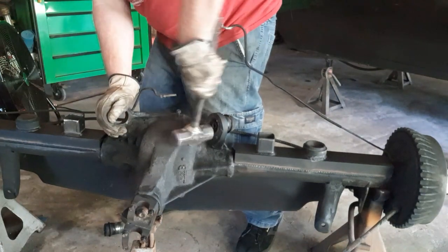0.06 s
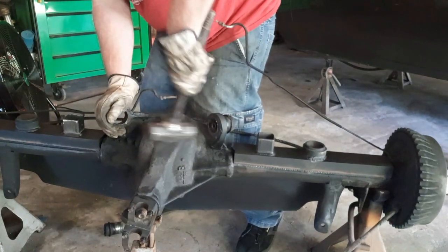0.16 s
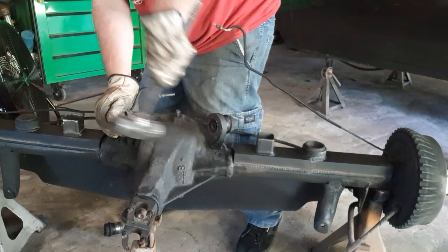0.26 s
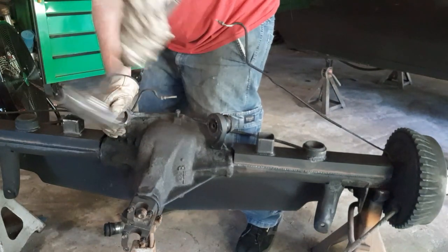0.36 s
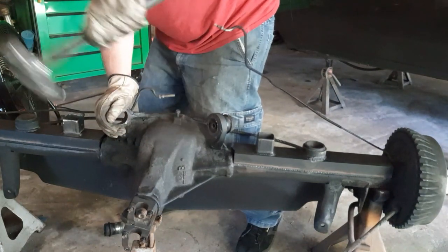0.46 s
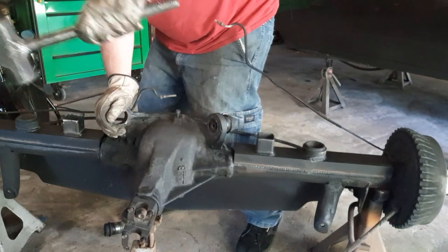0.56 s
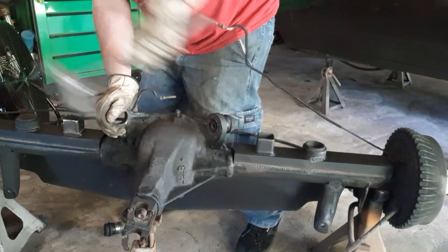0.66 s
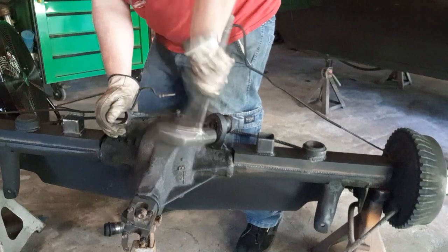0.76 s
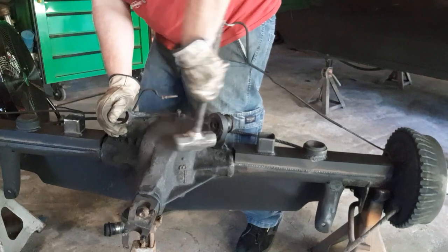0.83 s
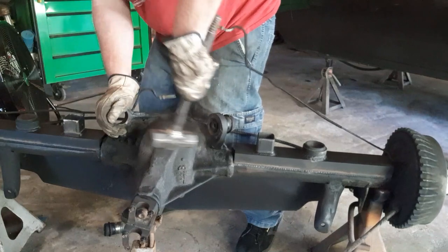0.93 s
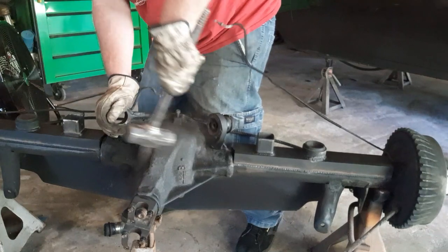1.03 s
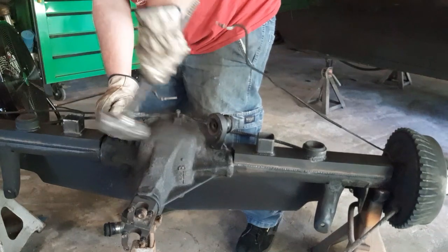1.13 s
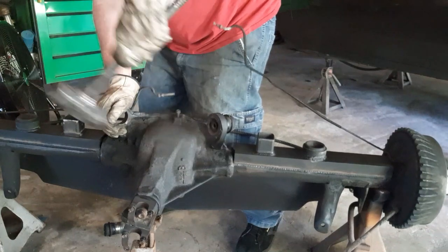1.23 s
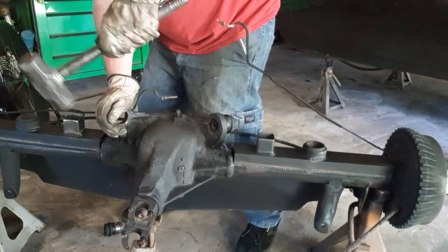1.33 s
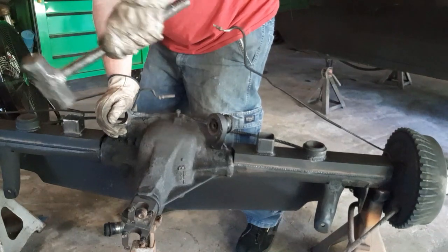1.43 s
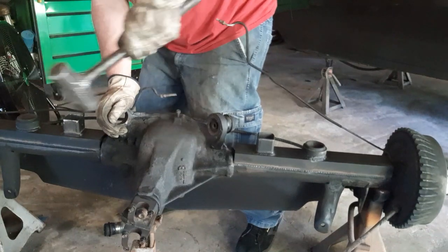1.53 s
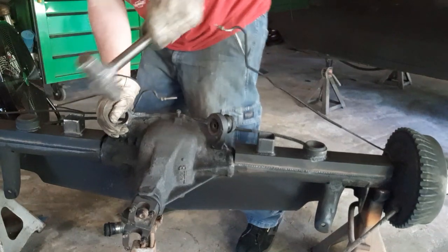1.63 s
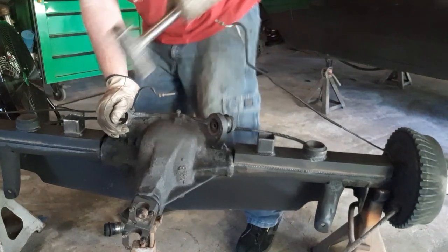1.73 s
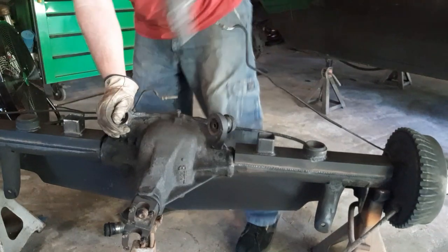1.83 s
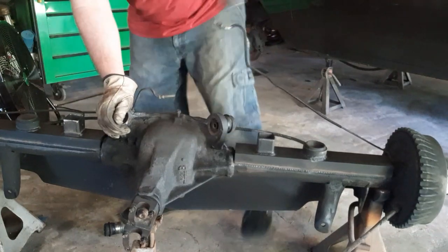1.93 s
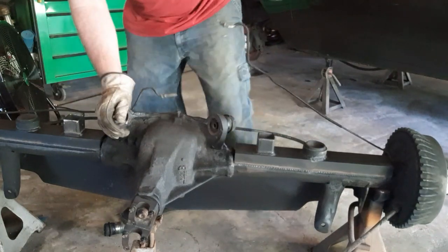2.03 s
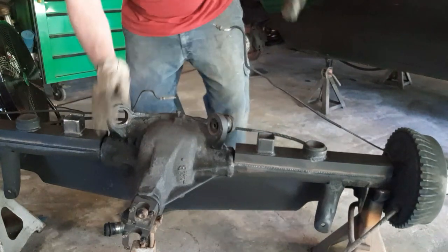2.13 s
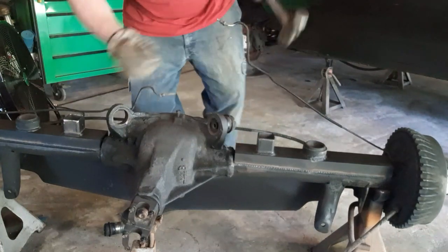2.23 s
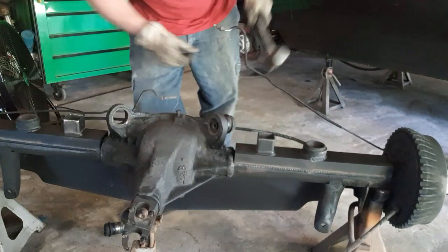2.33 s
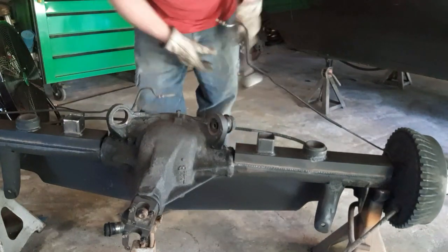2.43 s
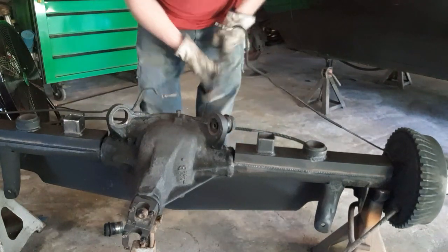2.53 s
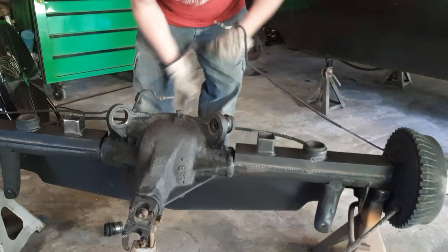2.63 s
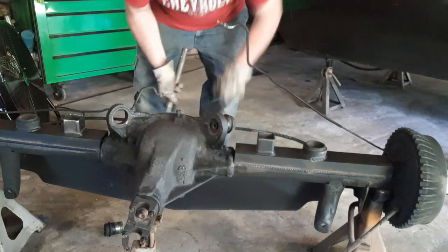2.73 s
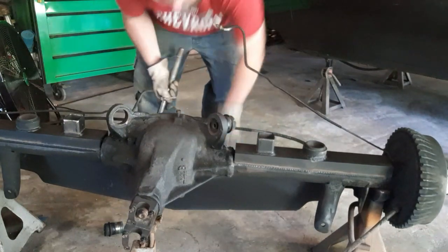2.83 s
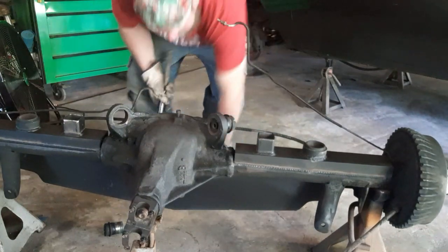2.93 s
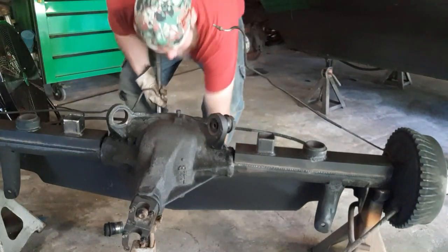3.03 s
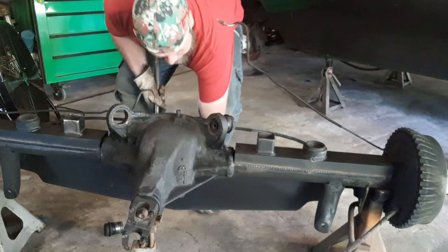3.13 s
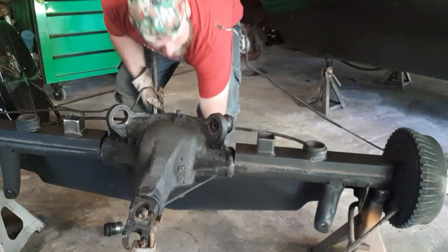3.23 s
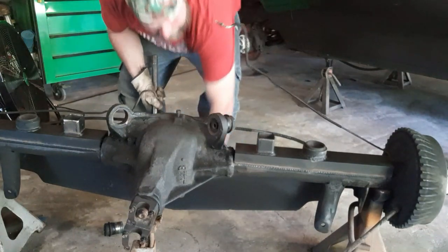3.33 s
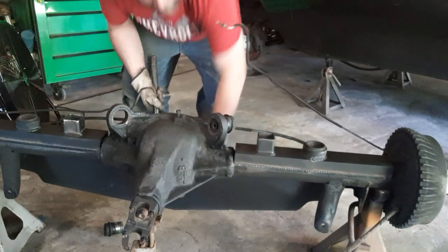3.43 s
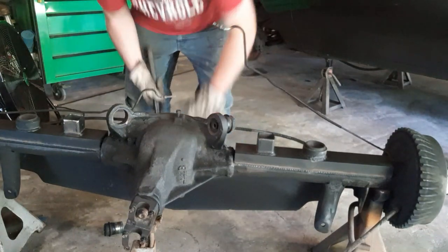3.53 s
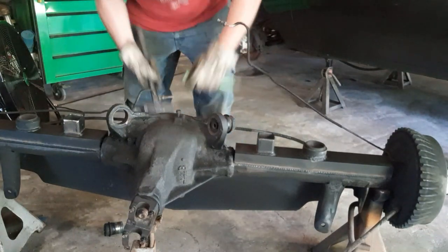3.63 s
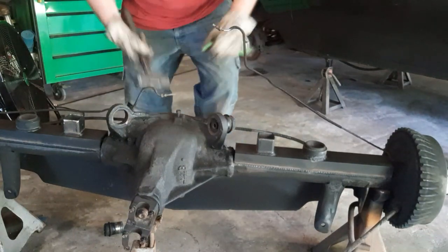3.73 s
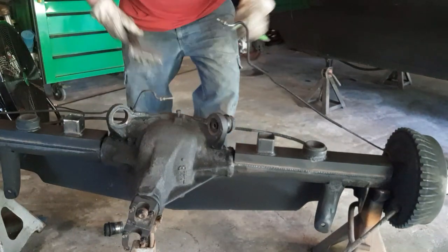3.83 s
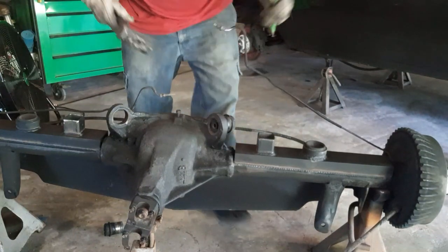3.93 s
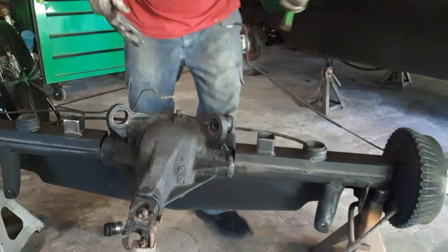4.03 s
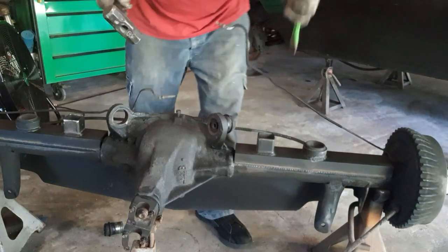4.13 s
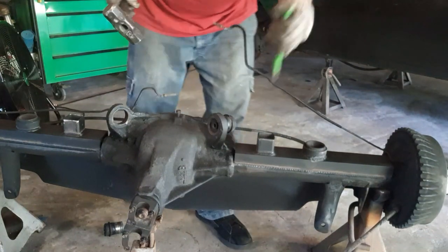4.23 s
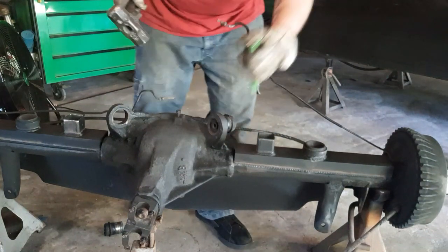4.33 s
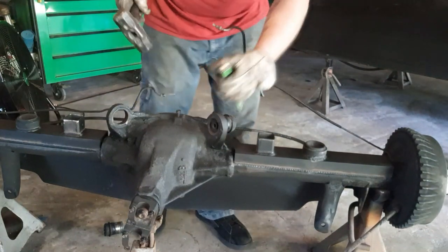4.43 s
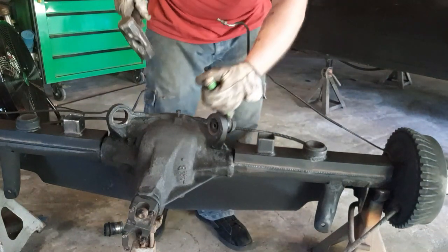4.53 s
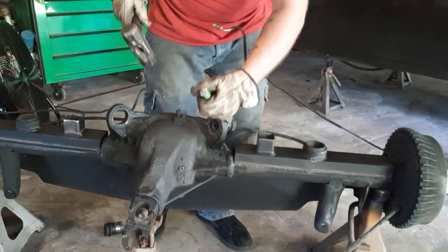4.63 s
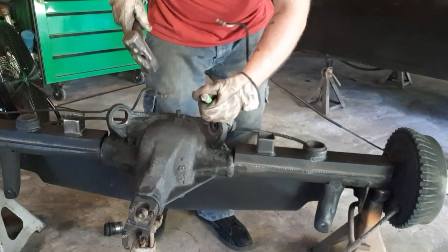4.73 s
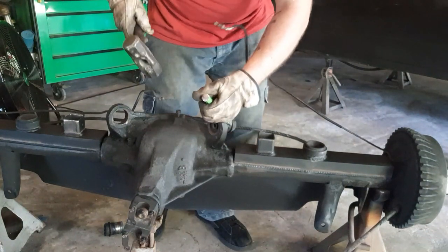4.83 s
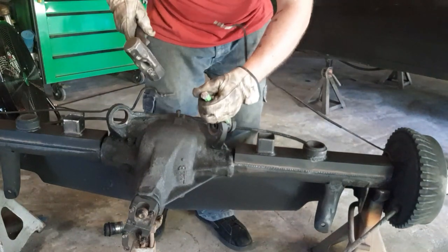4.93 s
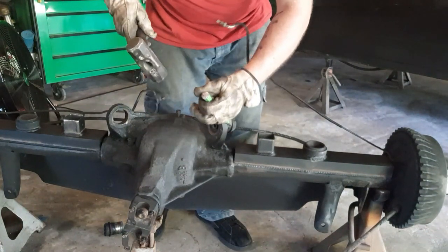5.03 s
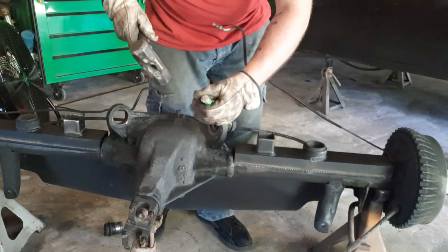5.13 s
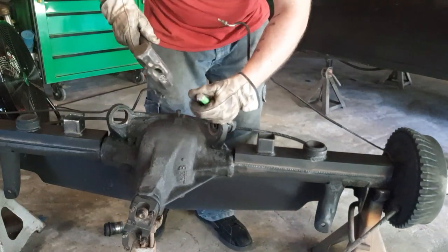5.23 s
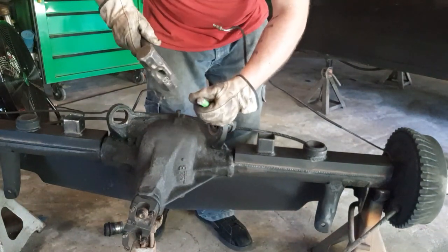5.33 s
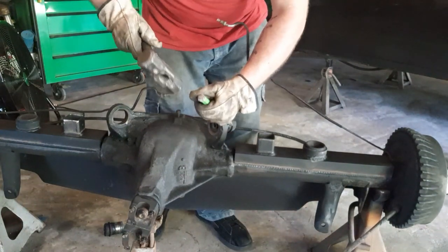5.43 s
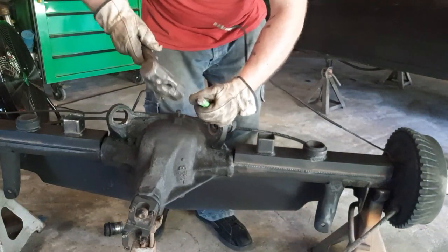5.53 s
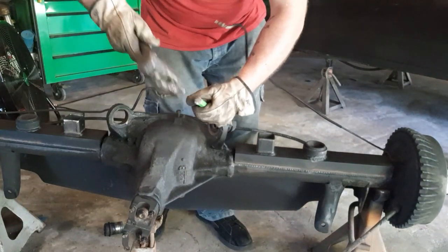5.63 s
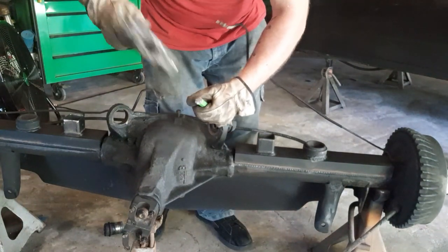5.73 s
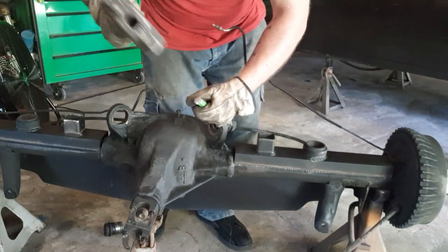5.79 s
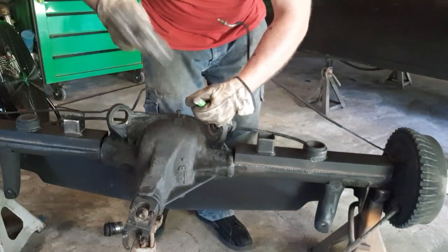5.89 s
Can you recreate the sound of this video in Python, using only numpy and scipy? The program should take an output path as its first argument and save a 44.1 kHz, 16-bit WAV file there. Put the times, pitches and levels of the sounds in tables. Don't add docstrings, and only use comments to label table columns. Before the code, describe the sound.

Two sharp steel-on-steel blows, about three quarters of a second apart, with short garage echoes and a long metallic ring. A quieter stretch follows: faint scuffs, a sudden tool clatter, a brief scraping rattle, a dull footstep, then scattered clinks and light taps. Stereo camera microphone nearby; its gain drops for the blows and rises in steps, uncovering hiss, low rumble and motor hum.

```python
import sys
import numpy as np
from scipy import signal
from scipy.fft import rfft, irfft
from scipy.io import wavfile
from scipy.ndimage import uniform_filter1d

SR = 44100
rng = np.random.default_rng(int(sys.argv[2]) if len(sys.argv) > 2 else 0)


def dump_mix(stems):
    frames = np.atleast_2d(stems).T
    limited = np.clip(frames, -1, 1)
    pcm = np.round(limited * 32767).astype(np.int16)
    wavfile.write(sys.argv[1], SR, pcm)


def undo_db(level):
    steps = np.asarray(level, float) / 20
    return 10 ** steps


N = 262836

# start in seconds, peak in dB, share of tool clank in dB, thud in dB,
# time the limiter holds the level in seconds.
BLOWS = [
    (0.057, -4.5, 1, 3, 0.034),
    (0.809, -5.5, 2, -8, 0.012),
]


def at(table, hz):
    f, v = np.transpose(table)
    return np.interp(np.log(hz + 1), np.log(f), v)


def curves(table):
    s, *columns = np.transpose(table)
    return [np.interp(np.arange(N) / SR, s, c) for c in columns]


def unit(x):
    return x / np.sqrt(np.mean(x ** 2))


def colour(x, table):
    n = x.shape[-1]
    return irfft(rfft(x) * undo_db(at(table, np.arange(n // 2 + 1) * SR / n)), n)


def band(x, lo_hz, hi_hz):
    edges = [lo_hz, min(hi_hz, .45 * SR)]
    return signal.sosfilt(signal.butter(3, edges, "bandpass", fs=SR, output="sos"), x)


def wander(rate):
    k = int(SR / rate)
    steps = np.repeat(rng.standard_normal(N // k + 1), k)[:N]
    return 1.2 * uniform_filter1d(steps, k)


def stroke(peak_s, rise_s, t60, hold_s):
    age = np.arange(0, N, 16) / SR - peak_s
    climb_db = 25 * age / max(rise_s, .001)
    fade_db = -60 * np.maximum(age - hold_s, 0) / max(t60, .02)
    return undo_db(np.where(age < 0, climb_db, fade_db))


def gestures(rows):
    power = sum(undo_db(2 * db) * stroke(s, rise_s, t60, hold_s) ** 2 for s, rise_s, db, t60, hold_s in rows)
    return np.interp(np.arange(N), np.arange(0, N, 16), np.sqrt(power))


def ring(modes, start_s, spread_db, beat_db, apart=1):
    out = np.zeros((2, N))
    t = np.arange(max(int(start_s * SR), 0), N) / SR - start_s
    first = N - len(t)
    for (hz, db, t60), c in zip(modes, rng.standard_normal((len(modes), 24))):
        u = t[:int(1.1 * t60 * SR)]
        beats = c[4:] * np.minimum(np.arange(20) / 4, 1)
        waver = np.interp(u, np.linspace(0, 1.1 * t60, 20), beats)
        place_gain = undo_db(spread_db * c[:2, None])
        fade = undo_db(db - 60 * u / t60 + beat_db * waver) * place_gain
        phase = 2 * c[2] + 2 * apart * (c[2:4, None] - c[2])
        out[:, first:first + len(u)] += fade * np.sin(2 * np.pi * hz * u + phase)
    return out


def garage(spectrum, hold_s):
    # frequency in Hz, time to fall 60 dB in seconds.
    echo_t60 = [(60, 0.11), (160, 0.36), (420, 0.42), (1100, 0.34), (2900, .35), (6500, .28), (9000, 0.18),
                (11000, 0.29), (14000, 0.082)]
    patchy_db = 2.5, 5
    t = np.arange(SR) / SR
    crack = unit(colour(rng.standard_normal((2, SR)), spectrum))
    bins = SR // 2 + 1
    below, above = patchy_db[0] * wander(500)[:bins], patchy_db[1] * wander(150)[:bins]
    patches = np.where(np.arange(bins) < 7500, below, above)
    crack = unit(irfft(rfft(crack) * undo_db(patches), SR))
    out = 0
    for hz in 45 * 2 ** np.arange(0, 8.6, .5):
        fade_db = -60 * np.maximum(t - hold_s, 0) / at(echo_t60, hz)
        out = out + band(crack, hz / 2 ** 0.14, hz * 2 ** .25) * undo_db(fade_db)
    lumps = undo_db(1.2 * wander(300)[:SR])
    return out * (1 + 0.52 * np.exp(-t / 0.0022)) * lumps


def blows():
    # frequency in Hz, level in dB per Hz.
    crack = [
        [(35, -54), (60, -29), (150, -12), (268, -10), (417, -9.5), (527, -9.5), (1040, -14.5), (1280, -8), (2470, -11), (5720, -11), (7060, -10.5), (7350, -23), (7650, -48.5), (7950, -29), (11200, -29), (13600, -33), (14900, -38.5), (16000, -91)],
        [(35, -70), (60, -43), (227, -19.5), (287, -8.5), (540, -13.5), (593, -12.5), (822, -10), (1040, -4.5), (1820, -7.5), (2090, -10), (6580, -10.5), (7570, -23.5), (11200, -31), (12100, -35), (16000, -54.5)],
    ]
    # frequency in Hz, level in dB, t60 in seconds.
    clank = [
        [(528, -6, 0.36), (829, 1, 0.23), (1324, -7, 0.3), (1457, -5, .3), (1631, -8, 0.37), (1859, -4, .3), (2078, 2, 0.28), (2261, -8, 0.37), (2659, 6, 0.24), (2789, 1, 0.26), (3042, -4, 0.24), (3451, -4, 0.27), (3741, -6, 0.28), (3825, -2, .27), (3993, 0, .25), (4253, -9, 0.26), (4980, -4, 0.18), (5620, -2, 0.19), (6632, -6, 0.24), (6870, -5, .2)],
        [(291, -12, .3), (533, -20, 0.4), (680, -12, .3), (827, 4, 0.17), (1561, -12, .3), (1865, -9, 0.33), (2315, -14, 0.3), (3155, -11, 0.3), (3456, -14, 0.3), (3710, -10, 0.27), (3970, -13, .25), (4323, -13, 0.3), (4673, -14, 0.3), (5010, -15, .25), (5230, -14, .25), (5459, -17, 0.3), (6481, -12, 0.22), (6772, -12, 0.22)],
    ]
    # frequency in Hz, level in dB, t60 in seconds.
    head = [(7980, -2, .12), (8550, -8, .2), (8710, -8, .2), (9030, -8, .18), (9680, -8, .15),
            (9808, -9, .17), (10100, -14, .19), (10330, -9, .25), (10820, -6, .17), (11210, -9, .22),
            (11730, -7, .22), (12510, -12, .25), (13150, -4, .14), (13960, -13, .33), (14030, -14, .33)]
    head_levels = -29.5, -32
    # frequency in Hz, level in dB, t60 in seconds.
    face = [
        [(6640, -14, 0.035)],
        [(6560, -11, 0.057)],
    ]
    # frequency in Hz, level in dB per Hz.
    haze = [(60, -20), (170, -8), (250, -2.5), (600, -10), (1200, -12), (2500, -21), (4200, -24),
            (5500, -44.5), (11000, -42), (12500, -79)]
    out = np.zeros((2, N))
    t = np.arange(2 * SR) / SR
    for (s, db, clank_db, _, hold_s), spectrum, tools, head_db, ping in zip(
            BLOWS, crack, clank, head_levels, face):
        i = int(s * SR)
        out[:, i:i + SR] += undo_db(db - 8.0) * garage(spectrum, hold_s)
        far = unit(colour(rng.standard_normal((2, 2 * SR)), haze))
        out[:, i:i + 2 * SR] += far * undo_db(db - 43 - 60 * t / 1.25)
        out += undo_db(db - 15.5 + clank_db) * ring(tools, s, 0.81, 3.2)
        out += undo_db(head_db) * ring(head, s, 1.4, 4.3, apart=0.26)
        out += ring(ping, s, 1.4, 2.2, apart=0.12)
    return out


def thuds():
    floor = [(115, 3.5, 0.044), (75, -8.5, 0.067), (51.4, -23.5, 0.3), (88, -25, 0.35)]  # Hz, dB, t60 s
    out = 0
    for s, db, _, thud_db, _ in BLOWS:
        out = out + undo_db(db - 16.0 + thud_db) * ring(floor, s - .002, 0, 7.3)[0]
    return out * undo_db(np.array([[3.0], [-6.0]]))


def housing():
    # frequency in Hz, level in dB, t60 in seconds.
    casting = [
        [(167, -11, .7), (250, -13, 1.3), (339, -15, .68), (377, -14, .74), (554, -10, 0.8), (684, -13, 0.56), (1109, -6, 0.9), (1217, -22, 0.66), (1324, -10, 0.5), (1534, -16, 0.88), (1707, -21, 1.2), (1787, -25, 2), (2245, -22, 0.91), (2412, -22, 0.66), (2837, -21, 0.47), (3144, -33, 1.5), (3235, -33, 1.3), (3429, -29, 0.83), (3564, -24, 0.83), (3650, -31, 1.5), (4075, -36, 2.2), (4194, -27, 0.28), (4936, -34, 0.25)],
        [(167, -17, 1.1), (215, -24, .4), (264, -15, 1.3), (307, -19, .85), (554, -7, 1.3), (624, -19, 1.5), (689, -26, 1.5), (764, -30, 3.5), (807, -17, 1.1), (1114, -7, 0.78), (1324, -13, 0.6), (1561, -23, 1), (1787, -16, 2.3), (2239, -34, 1.3), (2412, -33, 1.4), (2606, -22, 2.6), (2810, -30, 1.6), (3095, -35, 2.6), (3235, -33, 2.0), (3348, -33, 1.5), (3435, -30, 1.3), (3871, -33, 2.0), (4075, -31, 1.7), (4721, -32, 0.71)],
    ]
    casting_db = -52, -51
    listed_age_s = .24
    out = ring([(1289, -52.5, .45)], -0.059, 1.4, 0.092)
    for (s, *_), modes, db in zip(BLOWS, casting, casting_db):
        fresh = [(hz, d + np.log2(hz / 500) + 60 * listed_age_s / t60, t60) for hz, d, t60 in modes]
        out += undo_db(db) * ring(fresh, s, 1.2, 2.6, apart=.25)
    return out


def tubes(gain_db):
    # frequency in Hz, level at the blow in dB, fade in dB per second, share of camera gain.
    hums = [
        (409, -72, 3, 1.4),
        (475, -54, 20, 1),
    ]
    # start in seconds, damping by the glove on the casting, strength in dB.
    strikes = [
        (-.69, 1.55, 2),
        (.058, 1.55, 4),
        (.809, 1, 0),
        (2.45, 7, 0),
    ]
    out, t = 0, np.arange(N) / SR
    (*struck, touch_s), damping, strength_db = np.transpose(strikes)
    last = np.searchsorted(struck, t) - 1
    age = damping[last] * (t - np.array(struck)[last])
    age = age + damping[-1] * np.maximum(t - touch_s, 0)
    for hz, db, fade_db, share in hums:
        level_db = db - fade_db * age + strength_db[last]
        level_db = level_db + share * np.maximum(gain_db, 0) + 2.2 * wander(9)
        out = out + undo_db(level_db) * np.sin(2 * np.pi * hz * t + np.array([[0], [.6]]))
    return out


def drift():
    # frequency in Hz, width in Hz, level in dB.
    bar = [(1254, 80, -8), (3350, 200, -14), (6250, 570, -9), (3270, 60, -4), (3465, 70, 0), (5893, 105, 4),
           (6650, 29, -1), (8740, 42, -45), (9210, 76, -17), (10595, 120, -16), (12400, 17, -16.5),
           (13400, 34, -15), (15500, 60, -22)]
    # start in seconds, lowest mode in dB, middle modes in dB,
    # top modes in dB, contact length in seconds.
    drags = [(2.764, -68.5, -80, -80, 0.017), (3.228, -51.5, -49.5, -66, 0.015),
             (3.26, -51, -57, -59, 0.0089), (3.309, -55, -46, -49.5, 0.02), (3.335, -58, -42, -62, 0.014),
             (3.345, -58, -48, -46.5, .005), (3.351, -54.5, -43, -43.5, 0.0186),
             (3.377, -46.5, -53, -65.5, 0.015), (3.428, -49.5, -69, -69, 0.016),
             (3.499, -65.5, -84, -82, 0.038), (1.951, -84, -105, -105, 0.18), (4.84, -72, -99, -103, 0.015),
             (4.9, -75.5, -98, -96, .01), (4.948, -71.5, -97.5, -97, .015), (5.273, -77, -94, -100, 0.14)]
    rise_s, t60 = 0.0023, 0.19
    lowest, middle, top = (gestures([(row[0], rise_s, row[k], t60, row[-1]) for row in drags])
                           for k in range(1, 4))
    out = 0
    for hz, width, db in bar:
        phase = 2 * np.pi * np.cumsum(hz + 0.27 * width * wander(1.5 * width + 30)) / SR
        gain = lowest if hz < 2000 else undo_db(db) * (middle if hz < 4000 else top)
        flutter = undo_db(1.6 * wander(110))
        out = out + gain * undo_db(3.5) * flutter * np.array([np.sin(phase), np.cos(phase)])
    return out


def sparks():
    # peak in seconds, rise in seconds, level in dB, t60 in seconds, hold in seconds.
    contacts = [
        (.058, .002, -36, .04, .004),
        (.81, .002, -36, .06, .008),
        (3.355, .1, -60, .3, .03),
        (3.2, .06, -66, .3, .02),
    ]
    # frequency in Hz, level in dB per Hz.
    spectrum = [(2500, -20), (3200, 0), (7000, 0), (8000, -20), (9000, -6), (15500, -4), (16200, -50)]
    return gestures(contacts) * unit(colour(rng.standard_normal((2, N)), spectrum))


def clinks():
    # frequency in Hz, level in dB, t60 in seconds.
    parts = [
        [(517, -4, .4), (1000, -2, .23), (1260, -13, .4), (1569, -7, .3), (1944, -.5, .3), (2105, -3, .3), (2600, -11, .12), (3490, -7, .28), (4200, -10, .2), (6630, 3, .13)],
        [ (513.5, -1, .25), (600, -3, .18), (825, -8, .25), (900, -5, .22), (1320, -16, .2)],
        [(1631, -8, .25), (2659, -1, .24), (2741, -4, .24), (3717, -4, .25), (110, -3, .07)],
        [ (1110, -2.5, .22), (1324, -3, .2), (1457, -3, .2)],
        [(300, 0, .2)],
        [(300, 0, .15)],
        [(325, 0, .2)],
    ]
    # start in seconds, level in dB.
    ring_starts = [(4.649, -49.5), (5.087, -47), (.058, -22), (.81, -28), (3.61, -62), (3.815, -61),
                   (3.86, -62)]
    return sum(undo_db(db) * ring(modes, s, 0.47, 6.0, apart=0.34) for (s, db), modes in zip(ring_starts, parts))


def knocks():
    # start in seconds, peak in dB, ring in Hz, low body in dB, t60 in seconds.
    hits = [(1.615, -59, 1790, 1, 0.17), (1.766, -58.5, 6530, -1, 0.15), (2.048, -36.5, 6580, -33, 0.094),
            (2.313, -42, 3220, -6, 0.46), (2.745, -31.5, 3040, -1.5, 0.091), (2.791, -24, 2050, -26, 0.13),
            (2.917, -50.5, 900, 11.5, 0.049), (2.755, -16.5, 3860, -30, 0.18),
            (3.163, -28.5, 5930, -24, 0.51), (3.225, -34.5, 2860, 1, 0.64),
            (3.308, -26.5, 4527, -25, 0.067), (3.646, -38.5, 4750, -20.5, 0.39),
            (4.021, -32.5, 5530, -8.5, 0.15), (4.076, -46.5, 3680, -23.5, 0.36),
            (4.254, -45, 3740, -18, 0.069), (4.459, -30, 5540, -9, 0.17), (4.648, -28, 2930, -11, 0.26),
            (4.78, -44, 6560, -1, 0.16), (4.878, -43.5, 7170, -9, 0.21), (5.084, -40, 1634, -16, 0.33),
            (5.38, -50.5, 3910, -11, 0.093), (5.669, -52, 996, -7, 0.26)]
    out = np.zeros((2, N + SR))
    t = np.arange(SR // 2) / SR
    for s, db, hz, low_db, t60 in hits:
        noise = rng.standard_normal((2, len(t)))
        octaves_down = 1.38 - hz / 6170
        tick = unit(band(noise, hz / 2 ** octaves_down, min(hz * 1.46, 7300)))
        body = undo_db(low_db) * unit(band(noise, 290, 1250))
        i = int(s * SR)
        out[:, i:i + len(t)] += undo_db(db - 17.5 - 60 * t / t60) * (tick + body)
    return out[:, :N]


def resonate(noise, hz, width):
    return unit(signal.lfilter(*signal.iirpeak(hz, hz / width, SR), noise))


def rattles():
    # frequency in Hz, width in Hz, level in dB.
    parts = [
        [(322, 57, -4), (1272, 22, -4), (690, 36, -8), (3550, 36, -7), (1662, 96, 3), (2131, 84, 4.5), (2650, 60, -1), (3860, 55, 1), (4600, 43, -12), (5291, 26, -12.5)],
        [(524, 10, -4.5), (1000, 140, 1.5), (1558, 40, -1), (1260, 120, -2), (744, 90, -8), (2034, 60, 1), (2260, 48, -7), (3470, 60, -3.5), (4260, 70, -7), (6580, 61, -7)],
        [(511, 20, 3), (304.1, 23, -17), (868, 58, -5), (1300, 67, -7.5), (1730, 56, -15), (2090, 26, -23), (3464, 40, -12), (6140, 45, -17)],
        [(495, 4.6, -3.5), (850, 10, -6), (2200, 20, -14), (3450, 40, -7), (4005, 70, -4.5), (4298, 75, -11), (6050, 97, -5)],
    ]
    # start in seconds, level in dB, rattle length in seconds, t60 in seconds.
    hits = [(2.754, -44.5, 0.25, 0.346), (4.648, -54, 0.13, 0.56), (5.081, -55.5, 0.099, 0.47),
            (5.379, -54.5, .07, 0.34)]
    out = np.zeros((2, N + SR))
    t = np.arange(SR // 2) / SR
    for (s, db, lasts_s, t60), modes in zip(hits, parts):
        rattle = sum(undo_db(mode_db) * resonate(rng.standard_normal((2, len(t))), hz, width * 1.6)
                     for hz, width, mode_db in modes)
        fade_db = -60 * t / t60 - 300 * np.maximum(t - lasts_s, 0)
        i = int(s * SR)
        out[:, i:i + len(t)] += undo_db(db + fade_db) * rattle
    return out[:, :N]


def scuffs(gain_db):
    # peak in seconds, rise in seconds, level in dB,
    # t60 in seconds, sole rumble in dB.
    moves = [(1.657, 0.13, -85, 0.43, 12), (1.9, 0.64, -87, 6.7, 5), (2.05, 0.0045, -72, 10.4, -3.5),
             (2.316, 0.0033, -73, 0.18, 21), (2.331, 0.017, -61, 0.46, 10), (2.531, 0.15, -49.5, 0.57, -3),
             (2.755, 0.013, -42, 0.31, -8), (2.929, 0.061, -72.5, 6.5, 2.5), (3.165, 0.0061, -54, 1.2, -21),
             (3.214, 0.11, -50.5, 0.22, -11), (3.36, 0.41, -59.5, 0.24, -0.5),
             (3.47, 0.041, -68, 2.2, -2.5), (3.65, 0.01, -65.5, 0.43, -2.5), (4.085, 0.14, -64, 0.81, -2),
             (4.265, 0.047, -58, 0.275, -2.5), (4.47, .014, -46.5, .3, -9.5),
             (4.495, .034, -43.5, 0.3, -10), (4.7, 0.054, -72.5, 0.49, 13), (4.792, 0.038, -64, 0.22, -6),
             (5.064, 0.27, -70, 0.87, 2), (5.089, 0.038, -73, 0.51, 16.5), (5.236, 0.059, -74.5, 0.81, 2.5),
             (5.385, 0.043, -72, 0.24, 4), (5.448, 0.064, -85.5, 0.34, 21), (5.692, .3, -96.5, 1.2, 20)]
    # frequency in Hz, level in dB per Hz.
    rub_spectrum = [(590, -54), (1000, -11.5), (1550, -3.5), (1790, -4.5), (2850, -3), (4200, -2.5),
                    (6570, -2.5), (7800, -20.5), (10100, -25.5), (17200, -120)]
    sole_spectrum = [(100, -29), (180, -2.5), (350, 4), (700, 1), (1100, -8.5), (1700, -30), (4000, -48)]
    grit_spectrum = [(4590, -2.5), (7800, -10), (9200, 1.5), (11900, 6.5), (14800, -3.5), (15700, -6.5),
                     (16200, -50.5)]
    # time in seconds, level in dB.
    stillness = [(5.42, 0.5), (5.52, 0)]
    rows = [(s, rise_s, db, t60, 0.223 * min(rise_s, .15), sole_db) for s, rise_s, db, t60, sole_db in moves]
    drag = gestures([row[:5] for row in rows])
    sole = gestures([(s, rise_s, db + sole_db, t60, hold_s) for s, rise_s, db, t60, hold_s, sole_db in rows])
    dust = gestures([(s, rise_s, db, 0.87 * t60, hold_s) for s, rise_s, db, t60, hold_s, _ in rows])
    grains = rng.standard_normal((2, N)) * undo_db(2.0 * rng.exponential(size=N))
    rub = undo_db(5.0) * unit(colour(grains, rub_spectrum))
    drag = drag * undo_db(curves(stillness)[0])
    cloth = undo_db(-93 + gain_db)
    grit = np.hypot(undo_db(-7) * dust, cloth)
    return drag * rub + sole * unit(colour(grains, sole_spectrum)) + grit * unit(colour(grains, grit_spectrum))


def footfalls():
    # start in seconds, frequency in Hz, level in dB, t60 in seconds.
    steps = [
        (1.61, 120, -75, 0.14),
        (2.33, 169.3, -57, 0.23),
        (4.03, 115, -53, 0.17),
        (4.06, 173, -58.5, .2),
    ]
    return sum(ring([(hz, db, t60)], s, 1.0, 3.0, apart=.2) for s, hz, db, t60 in steps)


def leftover():
    # frequency in Hz, level in dB per Hz.
    tail = [(100, -3), (400, 0), (1500, -6), (4000, -16), (7000, -30)]
    t = np.arange(N) / SR
    return unit(colour(rng.standard_normal((2, N)), tail)) * undo_db(-70 - 60 * np.minimum(t, 2) / .4)


def motor(rumble_db):
    # time in seconds, turns in Hz, level in dB, second order in dB.
    speed = [(2.4, 80.07, -75, -6), (2.7, 81.07, -70, -7), (3.5, 77.03, -69, -7.5), (4.1, 79.5, -70, -2),
             (4.6, 80.64, -72.5, -5), (5.25, 82.23, -66, -4.5), (5.96, 86.15, -69.5, -3)]
    # multiple of the turning rate, level in dB.
    orders = [(3, -18), (4, -19), (5, -17)]
    hz, db, second_db = curves(speed)
    phase = 2 * np.pi * np.cumsum(hz + 0.55 * wander(10)) / SR
    hum = sum(undo_db(order_db + 2.0 * wander(10)) * np.sin(order * phase)
              for order, order_db in [(1, 0.0034), (2, second_db)] + orders)
    return hum * undo_db(db + 1.0 + np.minimum(rumble_db, 0))


def air(rumble_db, hiss_db):
    # frequency in Hz, level in dB per Hz.
    spectrum = [(15, -46), (25, -24), (92, 0), (175, -10.5), (200, -21.5), (309, -21), (363, -38),
                (451, -18.5), (775, -33.5), (1020, -27.5), (1740, -37.5), (2550, -41.5), (5730, -43),
                (6560, -36), (16000, -41)]
    noise = unit(colour(rng.standard_normal((2, N)), spectrum)) * undo_db(-68)
    out = band(noise, 900, 24000) * undo_db(hiss_db)
    for hz in 25 * 2 ** np.arange(5.5):
        out = out + band(noise, hz / 2 ** .5, hz * 2 ** .5) * undo_db(rumble_db + 2.0 * wander(17))
    return out


def ports(pair):
    # frequency in Hz, likeness of the two ports from -1 to 1.
    likeness = [(60, .85), (300, .85), (640, .55), (1400, -.1), (3000, 0), (6800, .1), (15000, 0)]
    n = pair.shape[-1]
    like = at(likeness, np.arange(n // 2 + 1) * SR / n)
    a, b = rfft(pair)
    return irfft(np.array([a, like * a + np.sqrt(1 - like ** 2) * b]), n)


def scene():
    # time in seconds, gain in dB.
    camera_gain = [(0, -5), (1.1, -6), (1.6, 0), (2.045, 0), (2.055, 7), (2.22, 11.5), (2.6, 12.5),
                   (5.96, 12)]
    gain_db, = curves(camera_gain)
    bass_cut_db, back_s = -27.5, 2.35
    rumble_db = np.interp(np.arange(N) / SR, [back_s - 0.1, back_s, back_s + 0.44], [bass_cut_db, -6, 1.5])
    rumble_db = np.maximum(rumble_db, bass_cut_db + 0.98 * gain_db)
    steel = blows() + housing() + tubes(gain_db) + drift() + knocks() + rattles()
    worker = scuffs(gain_db) + footfalls()
    room = air(rumble_db, -7.5 + 0.94 * gain_db)
    direct = thuds() + motor(rumble_db) + clinks() + leftover() + sparks()
    return ports(steel + worker + room) + direct


def band_limit(x):
    return signal.sosfilt(signal.butter(12, 15800, fs=SR, output="sos"), x)


def record(dry):
    top = .97
    heard = signal.sosfilt(signal.butter(2, 45, "highpass", fs=SR, output="sos"), dry)
    return band_limit(top * np.tanh(heard / top))


dry = scene()
out = record(dry)
dump_mix(out)
```